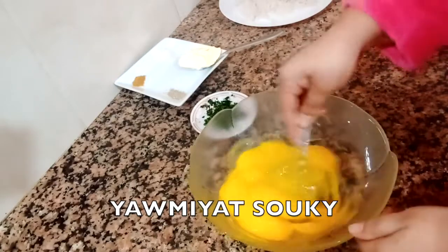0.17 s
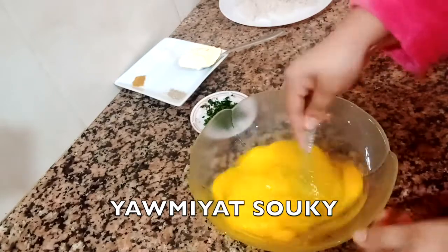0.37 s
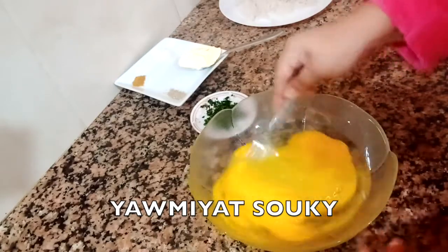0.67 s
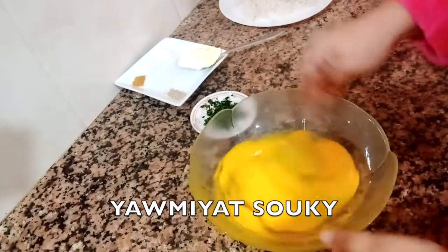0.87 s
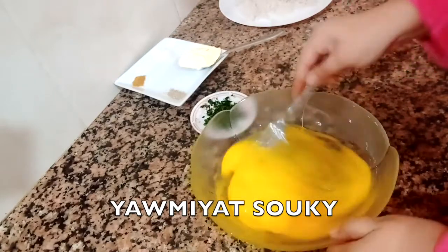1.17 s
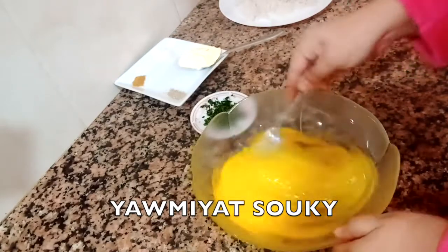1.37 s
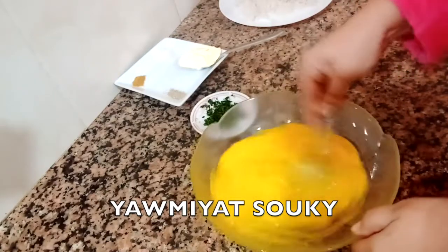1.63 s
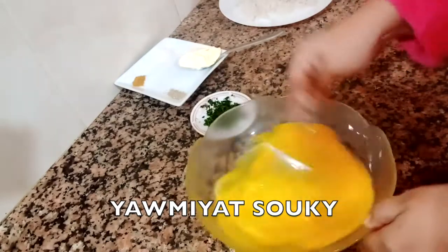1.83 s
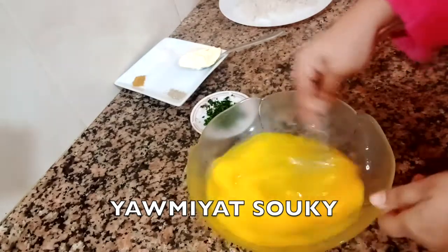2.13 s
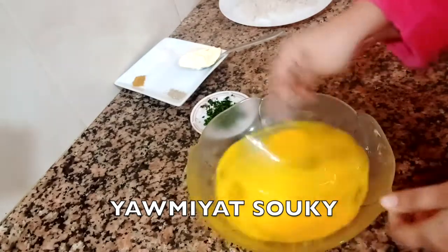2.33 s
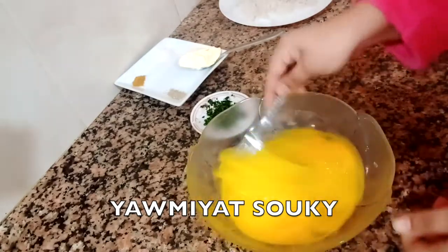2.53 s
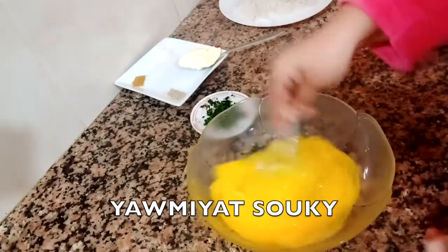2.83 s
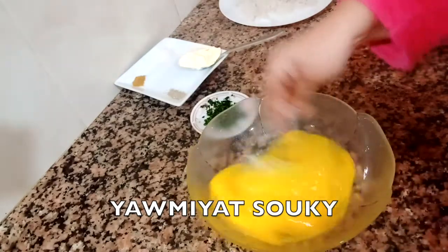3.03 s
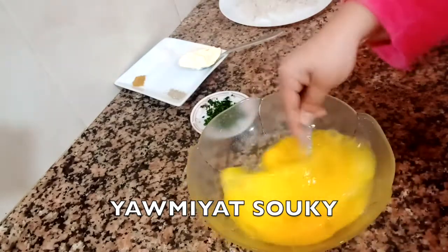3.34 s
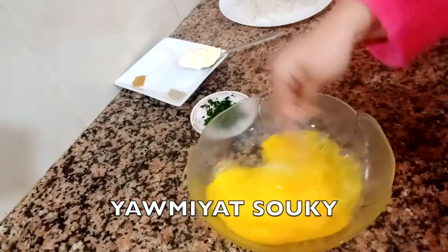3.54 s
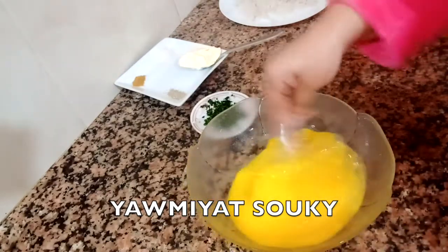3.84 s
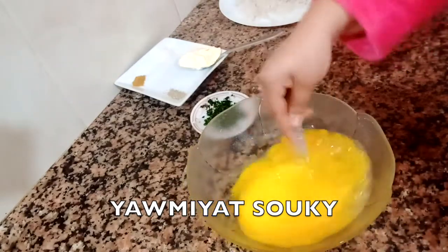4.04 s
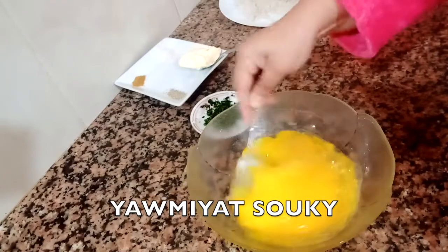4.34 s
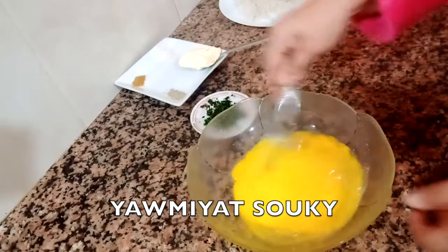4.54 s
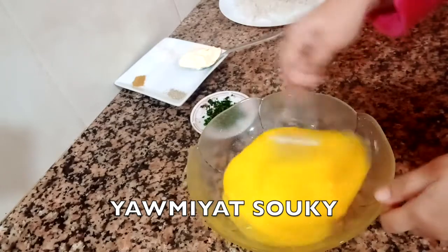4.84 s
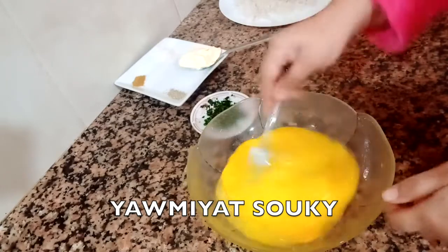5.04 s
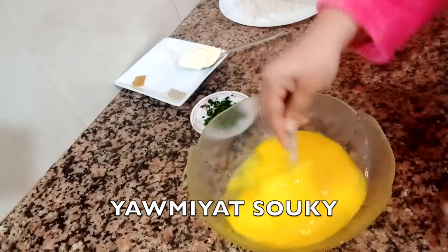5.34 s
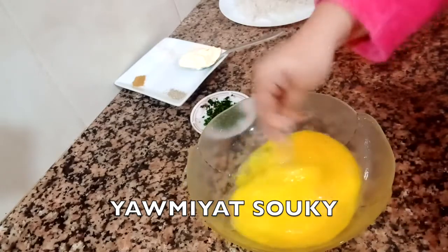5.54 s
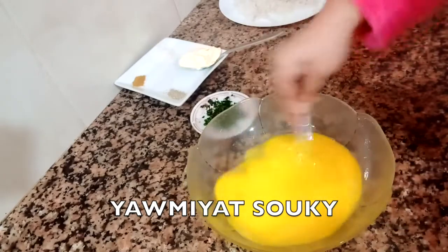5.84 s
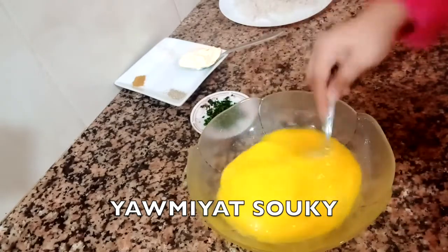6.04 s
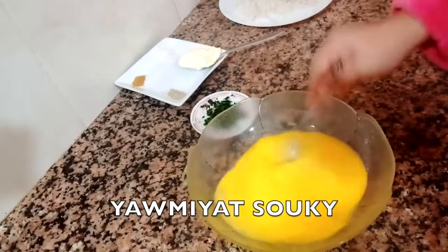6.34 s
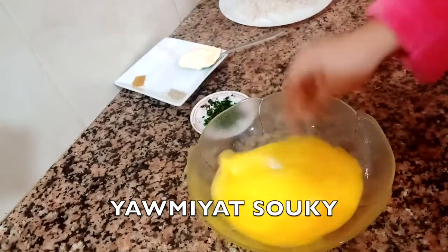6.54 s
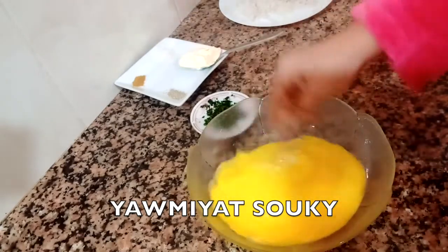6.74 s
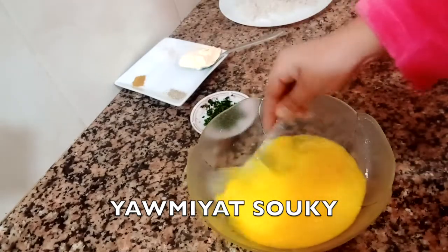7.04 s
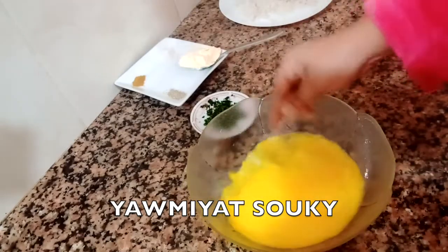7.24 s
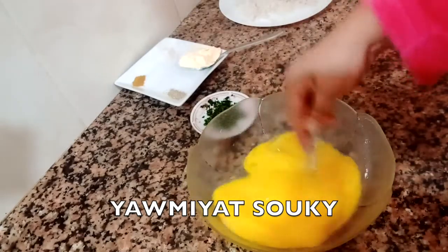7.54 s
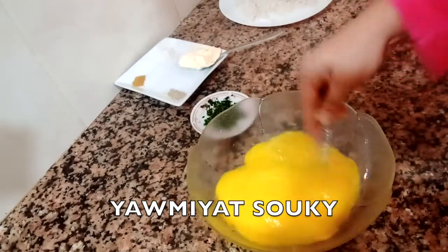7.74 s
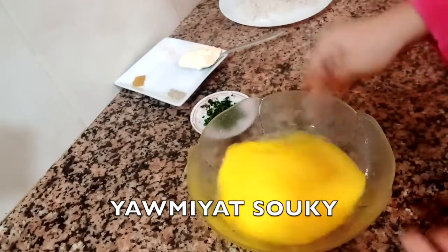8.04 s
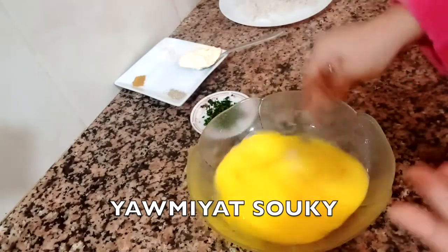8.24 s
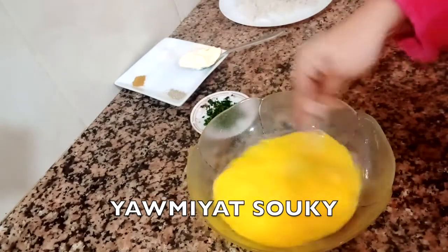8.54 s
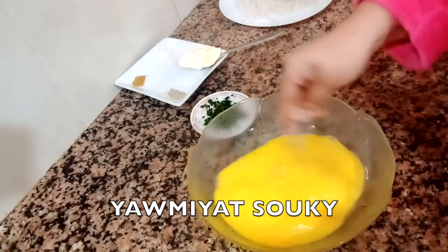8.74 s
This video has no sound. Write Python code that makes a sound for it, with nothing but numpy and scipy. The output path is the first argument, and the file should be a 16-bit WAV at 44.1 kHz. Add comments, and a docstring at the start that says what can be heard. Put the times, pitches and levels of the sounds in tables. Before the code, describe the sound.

A metal fork beats eggs quickly in a glass bowl, clicking and scraping against the glass over wet slaps and plops.

```python
"""A steel fork beats eggs in a glass bowl, about five and a half strokes a second.
Its tines (the prongs) click and skate on the glass, making both ring. Air pockets plop in the egg,
drops and foam crackle, and the bowl rocks on a stone counter. A hard-walled kitchen echoes
over faint room noise, all heard through a phone microphone."""
import sys
import numpy as np
from scipy import signal
from scipy.fft import rfft, irfft, next_fast_len
from scipy.io import wavfile
from scipy.ndimage import uniform_filter1d

SR = 44100
rng = np.random.default_rng(int(sys.argv[2]) if len(sys.argv) > 2 else 0)


def transcribe(signal):
    """Save signal, clipped to [-1, 1], as a 16-bit WAV file at the path in sys.argv[1]."""
    frames = np.atleast_2d(signal).T
    limited = np.clip(frames, -1, 1)
    pcm = np.round(limited * 32767).astype(np.int16)
    wavfile.write(sys.argv[1], SR, pcm)


N = 392490

# Air pockets slapped into the egg: start_s, level_db, pitch_hz
AIR_POCKETS = [(0.159, -51, 1357), (0.187, -54.5, 1160), (0.287, -66, 935), (0.33, -47, 1850),
               (0.369, -49, 2110), (0.389, -54, 1190), (0.507, -48, 1070), (0.527, -44, 790),
               (0.687, -47, 1864), (0.705, -38.5, 2320), (0.72, -38.5, 1000), (0.891, -51.5, 1310),
               (0.928, -46, 910), (1.043, -30.5, 1306), (1.089, -34, 802), (1.208, -45, 3220),
               (1.254, -53, 840), (1.312, -37, 436), (1.345, -41.5, 1310), (1.395, -42, 580),
               (1.431, -52, 1970), (1.494, -52.5, 1620), (1.56, -34, 830), (1.624, -40.5, 2210),
               (1.707, -40.5, 1118), (1.914, -52, 1820), (1.955, -46, 1780), (2.073, -43, 3070),
               (2.252, -29.5, 858), (2.415, -45.5, 863), (2.511, -58, 1000), (2.528, -45, 920),
               (2.534, -48.5, 1540), (2.596, -48, 793), (2.599, -41.5, 1360), (2.642, -45.5, 1254),
               (2.68, -47, 1930), (2.715, -46.5, 2920), (2.778, -43.5, 634), (2.967, -35.5, 909),
               (3.047, -54, 866), (3.11, -42, 734), (3.142, -39.5, 887), (3.297, -47, 670),
               (3.339, -37.5, 726), (3.403, -36.5, 972), (3.489, -47, 697), (3.51, -40.5, 896),
               (3.569, -46.5, 653), (3.609, -36.5, 2070), (3.643, -46.5, 720), (3.669, -44.5, 966),
               (3.813, -53.5, 1070), (3.83, -44, 807), (3.882, -47, 1770), (4.008, -46, 1100),
               (4.042, -48.5, 1015), (4.092, -42, 850), (4.172, -43.5, 960), (4.208, -42.5, 782),
               (4.375, -45, 1374), (4.511, -48, 870), (4.537, -40, 2780), (4.551, -45.5, 1353),
               (4.574, -50, 1376), (4.616, -43, 976), (4.645, -48, 2290), (4.732, -44.5, 504),
               (4.755, -48.5, 1200), (4.776, -50, 1580), (4.806, -52, 1630), (4.832, -56, 990),
               (4.908, -45, 3380), (4.93, -34.5, 1503), (4.964, -41, 761), (5.059, -40, 1400),
               (5.104, -46.5, 1160), (5.274, -40.5, 821), (5.36, -42, 2910), (5.446, -52.5, 814),
               (5.454, -46, 920), (5.487, -38, 1907), (5.52, -52, 886), (5.564, -47, 740),
               (5.626, -44, 1260), (5.631, -41.5, 816), (5.796, -48, 3100), (5.814, -35.5, 1118),
               (5.859, -49, 910), (5.923, -44, 2470), (5.952, -50, 2110), (6.012, -41.5, 1760),
               (6.064, -53, 1696), (6.159, -48, 850), (6.179, -47, 1390), (6.207, -44, 1700),
               (6.296, -50.5, 1760), (6.319, -48, 4100), (6.362, -42.5, 3190), (6.378, -44.5, 840),
               (6.407, -43, 800), (6.485, -47.5, 840), (6.536, -38, 914), (6.673, -45.5, 1830),
               (6.746, -40, 880), (6.915, -35.5, 600), (6.942, -45, 564), (7.086, -46.5, 750),
               (7.086, -40.5, 1855), (7.139, -48.5, 1360), (7.235, -50.5, 860), (7.269, -45.5, 1800),
               (7.29, -44, 2490), (7.309, -47.5, 720), (7.464, -46, 3120), (7.472, -49, 2660),
               (7.655, -40, 708), (7.821, -38.5, 881), (7.865, -51, 934), (7.895, -40.5, 928),
               (8.028, -44, 1140), (8.048, -41, 2300), (8.068, -43, 1093), (8.12, -48, 810),
               (8.228, -42.5, 2020), (8.234, -41, 786), (8.313, -44.5, 1790), (8.423, -37, 516),
               (8.491, -47, 882), (8.604, -46, 823), (8.625, -34.5, 2960), (8.761, -42, 537),
               (8.821, -43.5, 1127), (8.85, -39, 858)]


def tine_clicks():
    """A tine grazes the film of egg, hits the glass, and ends in a wet scrunch."""
    # Hits on the glass: start_s, level_db, pitch_hz, low_ring_db
    hits = [(0.158, -36, 2860, 23), (0.173, -24, 5930, 18.5), (0.3304, -34.5, 2500, 30),
            (0.3672, -22, 6500, 17), (0.3948, -29.5, 5450, 22.5), (0.5126, -23, 7040, 7),
            (0.5407, -25, 5700, 26.5), (0.6627, -49.5, 3540, 47), (0.6946, -25.5, 6060, -1),
            (0.706, -21, 5200, 5), (0.729, -34, 5930, 35), (0.81, -36, 5800, 14), (0.8875, -30.5, 6400, 18),
            (0.8998, -25.5, 6200, 1), (1.044, -26.5, 3550, 26), (1.066, -35, 6000, 31),
            (1.105, -29, 9500, 25), (1.206, -21.5, 3300, 25.5), (1.2458, -22, 6050, 11),
            (1.298, -36, 5800, 24), (1.4193, -35, 5230, 17), (1.5525, -24.5, 3640, 25),
            (1.5594, -12.5, 5700, -9), (1.706, -34, 3800, 30), (1.7395, -32, 3820, 3),
            (1.7552, -25.5, 5800, 24), (1.911, -21, 6330, 19), (1.9662, -30, 6000, 21),
            (2.0713, -28.5, 5770, 11), (2.1082, -31.5, 9700, 24), (2.2501, -23.5, 3600, 24),
            (2.3782, -41.5, 4530, 20), (2.4124, -21.5, 3600, 27), (2.4303, -20, 5200, 15.5),
            (2.4421, -21.5, 6000, 6), (2.596, -18, 8300, 16), (2.603, -22.5, 5560, 21),
            (2.6286, -32, 6300, 23), (2.7157, -42, 2980, 17), (2.7904, -27, 5470, 20.5),
            (2.81, -32, 5530, 14), (2.9457, -22, 5900, 11), (2.9613, -38.5, 4930, 48),
            (3.0047, -33.5, 9190, 26), (3.1138, -34, 9000, 30), (3.14, -19.5, 5800, 15.5),
            (3.27, -33, 3340, 21), (3.3141, -23.5, 5200, 19), (3.4895, -35, 5360, 38),
            (3.497, -27.5, 5430, 31), (3.6681, -22, 5100, 3), (3.812, -31, 3800, 23),
            (3.8369, -22.5, 5600, 13), (3.8683, -28.5, 3500, 31), (4.0202, -30, 6250, 24),
            (4.1645, -32.5, 3940, 31), (4.197, -33.5, 5900, 26), (4.376, -16, 9200, -4),
            (4.5296, -25.5, 9200, 5), (4.552, -28, 6200, 2), (4.592, -22.5, 5300, 10),
            (4.7002, -38.5, 5170, 28), (4.746, -22, 9400, 28.5), (4.7537, -26.5, 9570, 19),
            (4.9073, -21, 3470, 20), (4.9282, -14, 6420, 18.5), (4.955, -18, 6300, 5),
            (5.058, -30.5, 2750, 30), (5.094, -24.5, 3560, 6), (5.1125, -24.5, 10100, 21),
            (5.2765, -26, 5830, 12), (5.627, -24, 9800, 31), (5.6331, -23, 6750, 10),
            (5.654, -18.5, 7600, -1), (5.8123, -16.5, 5700, 3), (5.8254, -35.5, 3600, 41),
            (6, -34.5, 6260, 20), (6.0113, -19.5, 5140, 16), (6.022, -25.5, 6200, 29),
            (6.183, -23, 5970, 9), (6.2044, -25, 6100, 2), (6.298, -43, 2500, 30), (6.36, -19, 6200, 16.5),
            (6.3906, -33.5, 6200, 37), (6.5334, -19, 5760, 21), (6.551, -38, 10000, 25),
            (6.7347, -22, 9600, 25), (6.9255, -30, 9100, 24), (7.0832, -30.5, 6160, 18.5),
            (7.2743, -30.5, 6380, 6), (7.3047, -28, 9100, 27.5), (7.4732, -23.5, 5600, 11.5),
            (7.4839, -26.5, 2460, 27.5), (7.656, -26, 3260, 20), (7.668, -24, 5450, 18),
            (7.694, -25.5, 5730, 22), (7.71, -26, 5500, 21), (7.8414, -25, 5330, 4),
            (7.866, -24, 5400, 24.5), (7.884, -27, 6440, 15), (7.895, -26, 5300, 15),
            (7.917, -24, 10100, 22), (8.0334, -31.5, 7300, 20), (8.0682, -17, 6500, 16),
            (8.087, -20.5, 6300, 16), (8.2592, -21, 6000, 7), (8.2893, -23, 6050, 19),
            (8.3025, -25.5, 6500, 23), (8.312, -23, 5130, 26), (8.4278, -32, 4930, 10),
            (8.4548, -24, 5500, 17), (8.491, -23.5, 9700, 16), (8.6222, -29, 2900, 13),
            (8.636, -28, 5330, 17), (8.6587, -31, 6100, 16), (8.68, -29, 9100, 28),
            (8.8421, -27.5, 5600, 19)]
    start_s, level_db, pitch_hz, low_db = np.transpose(hits)[:, :, None]
    t = np.arange(4096) / SR - .008  # the hit lands at t = 0
    after_s = np.clip(t, 0, 1)
    age = after_s / .00076
    graze = amp(-34.5) * np.exp(-np.abs(t) / .013)
    blow = age * np.exp(-age)
    scrunch = amp(-7) * (1 - np.exp(-age)) * np.exp(-after_s / .0038)
    high_db = 15 + 2 * rng.standard_normal(start_s.shape)
    force = (graze + blow + scrunch) * rng.standard_normal((len(hits), len(t)))
    clicks = fork_and_glass(force, pitch_hz, low_db, high_db, hiss_db=-4, window=slice(350, 520))
    return place(start_s[:, 0] + t[0], amp(level_db - 5) * clicks)


def tine_skating():
    """The tines skate over the glass in tiny slips, pressing harder until they lift off."""
    # Fork strokes: start_s, level_db, pitch_hz, contact_s, high_ring_db, hiss_db
    strokes = [(0.0, -23, 6100, 0.0037, 16.5, -1.5), (0.158, -20.5, 6140, 0.033, 26, -15),
               (0.331, -41, 5490, 0.015, 11, -2), (0.5125, -24, 5670, 0.046, 20, 6.5),
               (0.685, -19.5, 6600, 0.054, 19, -1), (0.8858, -17.5, 6300, 0.032, 24, -16),
               (1.043, -14.5, 3860, 0.029, 21.5, 0.5), (1.2451, -22.5, 6100, 0.027, 16, 4),
               (1.3949, -24.5, 5570, 0.04, 15, 1.5), (1.5521, -21.5, 6550, 0.011, 14, 14),
               (1.7401, -14, 5740, 0.029, 24, -7), (1.9111, -21, 6470, 0.047, 15.5, -4.5),
               (2.0589, -30.5, 5700, 0.019, 20, 6), (2.251, -33, 3980, 0.0086, -2, 14),
               (2.4142, -37, 4030, 0.037, 11, 0), (2.597, -16, 5700, 0.0099, 28, 7),
               (2.7902, -22.5, 5400, 0.025, 24, 3), (2.9454, -16, 9500, 0.032, 25.5, 5),
               (3.114, -31.5, 6100, 0.073, 21, 12), (3.3113, -23.5, 5400, 0.017, 20, 4),
               (3.4786, -17, 5700, 0.052, 18, -1), (3.6669, -15.5, 5200, 0.034, 26, 2),
               (3.8367, -18.5, 3250, 0.025, 30, 12.5), (4.0183, -17, 6200, 0.011, 27, 4.5),
               (4.1642, -27.5, 4600, 0.042, 36.5, 25), (4.3657, -23, 8600, 0.032, -4, -14.5),
               (4.5298, -23, 9200, 0.053, 25.5, 11), (4.7006, -37.5, 5230, 0.015, 15, 14),
               (4.9083, -37, 6300, 0.016, -7, 13), (5.092, -23, 5130, 0.045, 19.5, 7),
               (5.2866, -23.5, 6200, 0.0038, 23.5, 14), (5.4444, -20, 5630, 0.028, 16, -0.5),
               (5.6152, -26, 5970, 0.067, 19, 8), (5.812, -12, 3460, 0.027, 37, -7),
               (6.001, -38, 5470, 0.022, 37, 15), (6.1545, -31.5, 4740, 0.0092, 17.5, 8.5),
               (6.3596, -29.5, 6350, 0.034, 18, 6), (6.5341, -18, 6270, 0.049, 22.5, 4.5),
               (6.7344, -37.5, 9400, 0.081, 25.5, 23.5), (6.924, -27, 8550, 0.023, 17.5, 11.5),
               (7.0825, -33, 6100, 0.058, 17.5, 8.5), (7.2746, -37, 6100, 0.067, 21, 15),
               (7.473, -21, 3000, 0.032, 26.5, 15.5), (7.6566, -17.5, 3680, 0.03, 27, 8),
               (7.8406, -41, 5160, 0.069, 13, 9), (8.034, -30.5, 7400, 0.013, 9, 11),
               (8.2152, -38.5, 6300, 0.087, 4, 3), (8.4266, -26.5, 6500, 0.087, 18.5, 8.5),
               (8.624, -22.5, 4900, 0.055, 15.5, 3.5), (8.843, -20.5, 5460, 0.015, 34, 5)]
    start_s, level_db, pitch_hz, contact_s, high_db, hiss_db = np.transpose(strokes)[:, :, None]
    t = np.arange(8192) / SR
    noise, chance, size = rng.standard_normal((len(strokes), 3, len(t))).transpose(1, 0, 2)
    slips = (chance > 2.3) * amp(5.7 * np.clip(size, -2, 1.5))
    roughness = .5 + unit(np.abs(uniform_filter1d(slips, 24)))
    swell = amp(2.5 * np.clip(t / np.clip(contact_s, .002, 1), 0, 1))
    pressure = swell * rise(t, .00071) * fade(np.clip(t - contact_s, 0, 1), fade_s=.081)
    force = pressure * roughness * noise
    scrapes = fork_and_glass(force, pitch_hz, 19, high_db, hiss_db, window=slice(1800))
    return place(start_s[:, 0], amp(level_db - 15) * scrapes)


def fork_and_glass(force, pitch_hz, low_db, high_db, hiss_db, window):
    """Steel and glass answer a force with a click, hiss and ringing, scaled to level 1 in the window."""
    # Low, middle and high ringing tones: pitch_hz, width_hz, level_db
    low_tones = [(3542, 118, -7.5), (5240, 157, 4.5), (6300, 405, 2.5), (6502, 340, 4)]
    mid_tones = [(8400, 47, -18), (10076, 580, -3), (9930, 1700, -3)]
    high_tones = [(14990, 427, 19.57), (16040, 4120, 9.68)]
    length = 2 * force.shape[1]
    f = np.fft.rfftfreq(length, 1 / SR)
    ripple_db = 3.5 * unit(uniform_filter1d(rng.standard_normal((len(force), len(f))), len(f) // 40))
    click = .5j * f * pitch_hz / (pitch_hz ** 2 - f * f + .23j * f * pitch_hz)
    hiss = amp(hiss_db + ripple_db) * (1j * f / (.15 * pitch_hz + 1j * f)) ** 2
    ring = amp(low_db) * ringing(low_tones, f, pitch_hz, favour_db=14.5)
    ring += amp(8) * ringing(mid_tones, f, pitch_hz, favour_db=-5.5)
    ring += amp(high_db - 7) * ringing(high_tones, f, pitch_hz)
    sound = irfft(rfft(force, length) * (click + hiss + ring))
    return sound / np.sqrt(np.mean(sound[:, window] ** 2, axis=1, keepdims=True))


def egg_plops():
    """Each air pocket sings a short gliding note with a wet slap; egg sloshes over it in gulps."""
    # Hollow tones of the glass with egg in it: pitch_hz, width_hz, level_db
    hollow_tones = [(707, 25, -12.5), (1154, 20, 3.5)]
    start_s, level_db, pitch_hz = np.transpose(AIR_POCKETS)[:, :, None]
    t = np.arange(SR // 8) / SR
    age = t / (.021 * (pitch_hz / 1000) ** -.45)  # small, high pockets die sooner
    settle_s = 1.8 / pitch_hz  # the note starts high, then settles
    glide = .98 + .07 * (rng.random(pitch_hz.shape) - .3) * age
    cycles = pitch_hz * (.22 * settle_s * rise(t, settle_s) + t * glide)
    note = np.sin(2 * np.pi * cycles) * np.exp(-3 * age) * rise(t, .0018)
    burst = rise(t, .0027) * fade(t, fade_s=.011) * rng.standard_normal(note.shape)
    slap = band(burst, pitch_hz, width=.7)
    slap *= amp(-7) / np.abs(slap).max(axis=1, keepdims=True)
    gulps = amp(5 * unit(uniform_filter1d(rng.standard_normal(note.shape), 300)))
    slosh = band(gulps * rng.standard_normal(note.shape), pitch_hz, width=.65)
    slosh *= amp(-12) * rise(t, .00053) * fade(t, fade_s=.089) / slosh.std(axis=1, keepdims=True)
    plops = place(start_s[:, 0], amp(level_db) * (note + slap + slosh)) + bubbles()
    return plops + amp(-9.5) * filtered(plops, lambda f: ringing(hollow_tones, f))


def bubbles():
    """Small bubbles ring after each pocket, some rising in pitch and some falling."""
    start_s, level_db, pitch_hz = np.transpose(AIR_POCKETS)[:, :, None, None]
    wait, tone, size, life, glide = rng.random((len(start_s), 18, 5, 1)).transpose(2, 0, 1, 3)
    delay_s = -.05 * np.log(1 - .97 * wait)
    cycles = pitch_hz * np.exp(1.7 * (tone - .25)) * np.arange(1000) / SR
    bend = 1 + .04 * (glide - .35) * cycles
    notes = np.sin(2 * np.pi * cycles * bend) * np.exp(-cycles / (2 + 7 * life)) * rise(cycles, 1)
    gain = amp(level_db - 8 - 20 * (1 - size ** 2) - 4 * tone - 60 * delay_s)
    return place(np.clip(start_s + delay_s, 0, N / SR), gain * notes)


def droplets():
    """After each slap, flung drops and bursting foam crackle in the sticky egg."""
    start_s, level_db, _ = np.transpose(AIR_POCKETS)[:, :, None, None]
    wait, tone, size, life = rng.random((len(start_s), 14, 4, 1)).transpose(2, 0, 1, 3)
    delay_s = -.075 * np.log(1 - .97 * wait)
    cycles = 1300 * np.exp(1.5 * tone) * np.arange(600) / SR
    ticks = np.sin(2 * np.pi * cycles) * np.exp(-cycles / (1 + 12 * life ** 2)) * rise(cycles, .5)
    gain = amp(level_db - 13 - 24 * (1 - size ** 3))
    return place(np.clip(start_s + delay_s, 0, N / SR), gain * ticks)


def bowl_rocking():
    """The pushed bowl shakes on the stone and sounds its low tones, in a new mix each time."""
    # Rocking moments: start_s, level_db, brightness_db_per_octave
    rocks = [(0.374, -68.5, -10), (0.531, -50, -3.5), (1.074, -46, -9.5), (1.313, -62, -11),
             (1.564, -62.5, -10.5), (1.92, -62.5, -14), (2.61, -64, -20), (2.964, -57, -1.5),
             (3.516, -51.5, -6.5), (3.83, -51.5, 1.5), (4.068, -70, 5), (4.191, -51.5, -3.5),
             (4.389, -52.5, -2.5), (4.957, -62, -18.5), (5.135, -60.5, 1), (5.291, -56.5, -1.5),
             (5.464, -55, -2.5), (5.637, -50.5, -5.5), (5.811, -57, 10), (6.179, -60.5, 5),
             (6.385, -50.5, -4.5), (6.575, -53, -7), (6.749, -54.5, -0.5), (6.933, -65.5, -3),
             (7.232, -54.5, -1.5), (7.474, -61.5, 6), (7.664, -54, -2.5), (7.897, -51.5, -3.5),
             (8.067, -51.5, -3.5), (8.287, -60.5, 10), (8.505, -57, -1), (8.845, -53.5, -3)]
    # Tones of the bowl on stone: pitch_hz, width_hz, level_db
    bowl_tones = [(143, 13, 1), (202, 15, 6.5), (327, 20, .5), (413, 15, 1), (560, 60, -11)]
    start_s, level_db, brightness = np.transpose(rocks)[:, :, None]
    t = np.arange(16384) / SR
    f = np.fft.rfftfreq(len(t), 1 / SR)
    shake = rise(t, .013) * fade(t, fade_s=.15) * rng.standard_normal((len(rocks), len(t)))
    tones = ringing(bowl_tones, f, np.full_like(start_s, 300))
    thud = amp(-18.5) / (1 + (f / 600) ** 4)
    bass_cut = amp(curve([(50, -18.5), (130, -9.5), (800, -.5)], f))
    tilt = amp(brightness * np.clip(np.log2((f + 1) / 250), -1, 1))
    knocks = irfft(rfft(shake) * (tones + thud) * bass_cut * tilt, len(t))
    knocks /= knocks[:, :SR // 10].std(axis=1, keepdims=True)
    return place(start_s[:, 0] - .012, amp(level_db - 13) * knocks)


def kitchen_echo(sound):
    """Hard walls give each short stretch of sound its own uneven tail; the treble dies first."""
    # Time the echo takes to fall 60 dB: pitch_hz, fade_s
    fade_times = [(150, 0.62), (600, 0.46), (3000, 0.33), (15000, 0.26)]
    step, echo = SR // 6, np.zeros(N + SR)
    for start in range(0, N, step):
        hz, t, noise = signal.stft(rng.standard_normal(SR // 2), SR, nperseg=256)
        uneven = amp(3 * patches(noise.shape, bands=5, frames=14))
        decay = fade(t, curve(fade_times, hz)[:, None])
        tail = signal.istft(noise * uneven * decay, SR, nperseg=256)[1]
        answer = signal.fftconvolve(sound[start:start + step], tail / np.linalg.norm(tail))
        echo[start + 130:][:len(answer)] += answer
    return echo[:N]


def room_noise():
    """Faint room noise drifts in patches."""
    # Tone balance of the quiet kitchen: pitch_hz, level_db
    balance = [(25, -16), (60, -11), (100, 1), (160, -1.5), (450, -28), (900, -29), (3000, -15),
               (16000, -13.5)]
    noise = signal.stft(rng.standard_normal(N), nperseg=512)[2]
    drift = amp(3.5 * patches(noise.shape, bands=8, frames=12))
    hush = signal.istft(noise * drift, nperseg=512)[1][:N]
    return amp(-75) * unit(filtered(hush, lambda f: amp(curve(balance, f))))


def ringing(tones, f, struck_hz=None, favour_db=0):
    """A filter of ringing tones. Hits vary them a little; favour_db lowers those far from struck_hz."""
    total = 0
    for k, (hz, width_hz, db) in enumerate(tones):
        if struck_hz is not None:
            distance = np.clip(3 * np.abs(np.log2(hz / struck_hz)), 0, 1)
            db = db - favour_db * distance + 1.8 * rng.standard_normal(struck_hz.shape)
            hz = hz * (1 + .01 * rng.standard_normal(struck_hz.shape))  # the egg detunes it
        damping = 1j * f * width_hz
        total = total + (-1) ** k * amp(db) * damping / (hz * hz - f * f + damping)
    return total


def band(sounds, hz, width):
    """Keeps what lies near hz; width is a share of that pitch."""
    length = sounds.shape[1]
    f = np.fft.rfftfreq(length, 1 / SR)
    peak = f * hz * width / (hz * hz - f * f + 1j * f * hz * width)
    return irfft(rfft(sounds) * peak ** 2, length)


def patches(shape, bands, frames):
    """Smooth random ups and downs across pitch and time."""
    return unit(uniform_filter1d(uniform_filter1d(rng.standard_normal(shape), bands, axis=0), frames))


def rise(t, rise_time):
    """Climbs from 0 toward 1."""
    return 1 - np.exp(-t / rise_time)


def fade(t, fade_s):
    """Falls 60 dB every fade_s."""
    return amp(-60 * t / fade_s)


def amp(db):
    """Turns decibels into a gain."""
    return 10 ** (np.asarray(db) / 20)


def unit(x):
    """Scales to an average (rms) level of 1."""
    return x / np.sqrt(np.mean(x ** 2) + 1e-20)


def curve(points, hz):
    """Joins (pitch_hz, value) points on a log pitch scale."""
    pitches, values = np.transpose(points)
    return np.interp(np.log(hz + 1), np.log(pitches + 1), values)


def filtered(sound, response):
    """Multiplies each frequency by response(hz)."""
    length = next_fast_len(N + SR // 2)
    return irfft(rfft(sound, length) * response(np.fft.rfftfreq(length, 1 / SR)), length)[:N]


def place(starts_s, sounds):
    """Adds short sounds into one track at their start times."""
    at = np.round(starts_s * SR).astype(int).reshape(-1, 1) + np.arange(sounds.shape[-1])
    return np.bincount(at.ravel(), sounds.ravel(), N + SR)[:N]


def scene():
    """Mixes fork, egg and bowl with the kitchen around them."""
    # Fork and egg are too small to send out bass: pitch_hz, gain_db
    bass_cut = [(380, -24.5), (540, -9), (680, -3.5)]
    fork_and_egg = tine_clicks() + tine_skating() + egg_plops() + droplets()
    beating = filtered(fork_and_egg, lambda f: amp(curve(bass_cut, f))) + bowl_rocking()
    return (beating + amp(-6) * kitchen_echo(beating) + room_noise())[None]


def record(dry):
    """A small microphone dips the treble and cuts off the very top."""
    # Microphone response: pitch_hz, gain_db
    microphone = [(150, 0.5), (400, 10.5), (10500, -1.5), (12800, -17), (14000, -6), (15700, -18.5),
                  (16300, -54), (16900, -27)]
    top_hz = 16990
    return filtered(dry[0], lambda f: amp(curve(microphone, f)) * (f < top_hz))[None]


dry = scene()
out = record(dry)
transcribe(out)
```